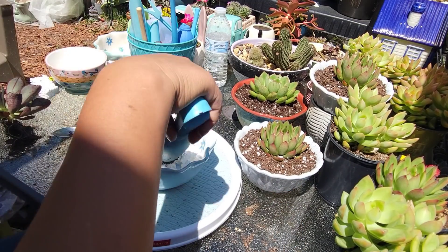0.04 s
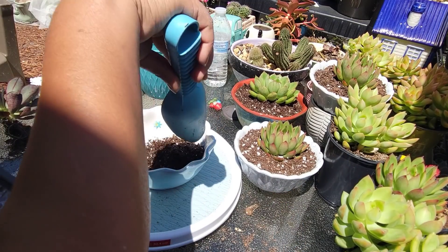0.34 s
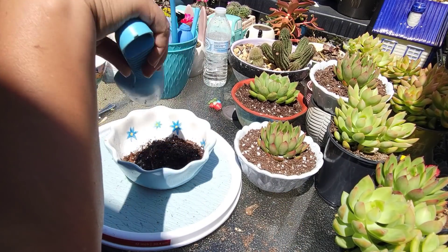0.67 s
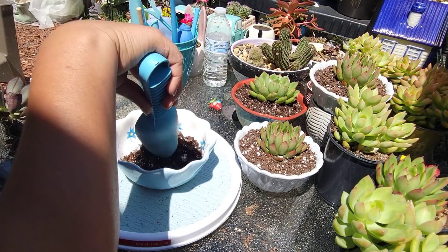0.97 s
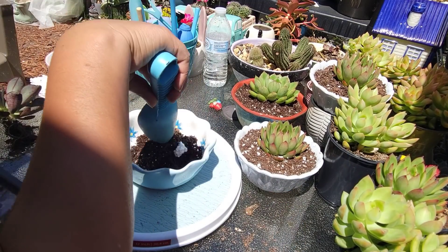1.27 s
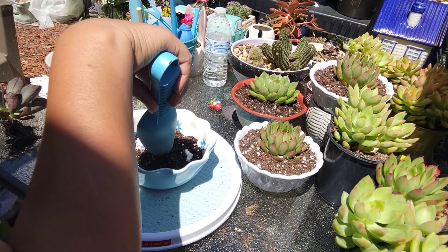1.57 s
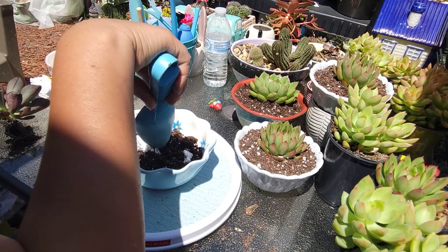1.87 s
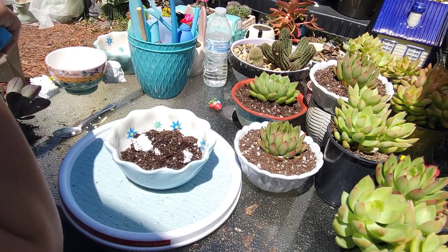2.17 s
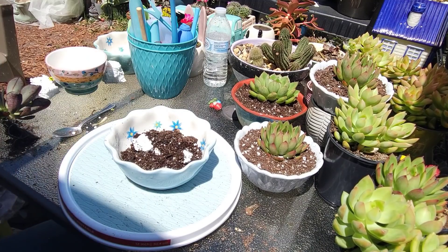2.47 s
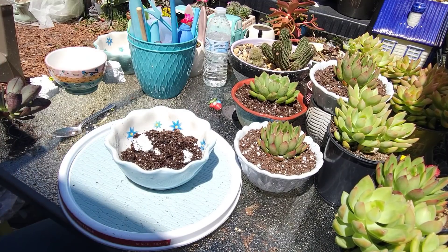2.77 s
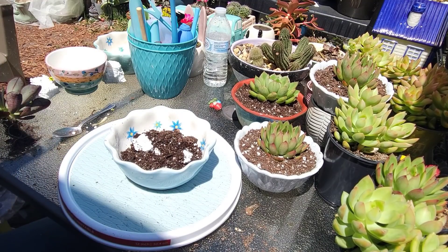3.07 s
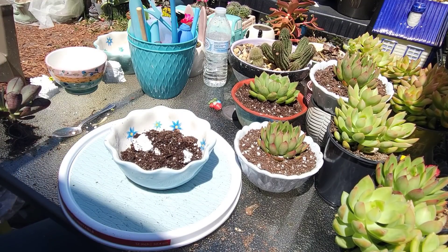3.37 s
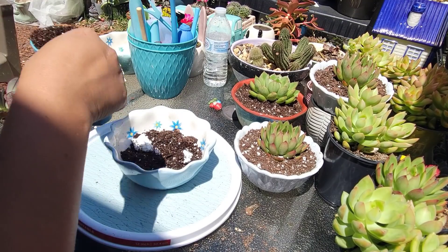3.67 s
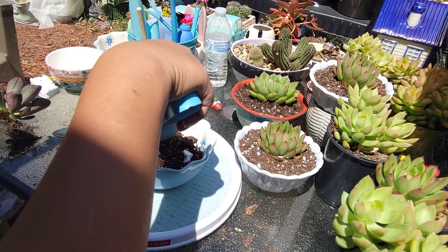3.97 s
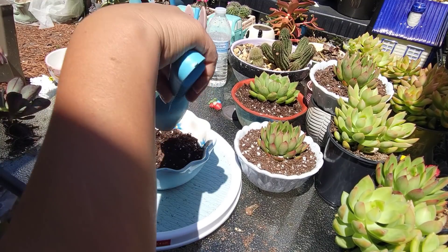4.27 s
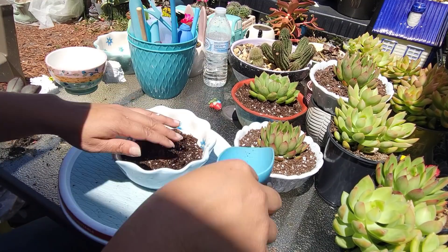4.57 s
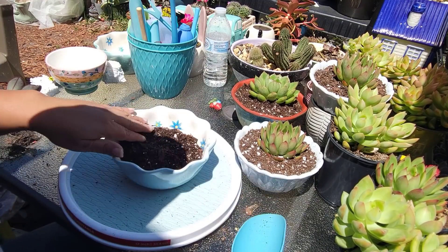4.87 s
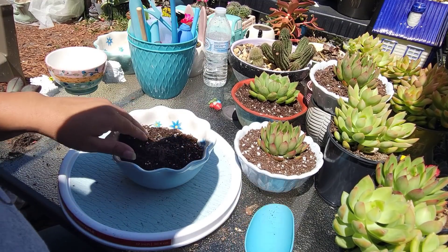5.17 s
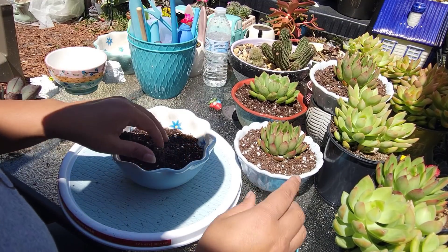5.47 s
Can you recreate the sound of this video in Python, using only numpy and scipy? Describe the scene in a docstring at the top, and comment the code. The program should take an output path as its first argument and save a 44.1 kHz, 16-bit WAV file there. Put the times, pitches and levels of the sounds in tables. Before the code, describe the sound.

Gritty soil slides from a plastic scoop into a clinking ceramic bowl, then a hard knock, over birds and distant traffic.

```python
"""Potting at a garden table, while distant traffic rumbles throughout. First gritty soil slides off a
plastic scoop, hissing and pattering into a ceramic bowl, and the scoop clinks on the rim. As stones and
clods fall, sparrows begin to chirp (three times near, once far off) and another bird scolds in dry rasps.
After three seconds the scoop digs for more, then grazes the bowl and spills a little soil.
Near the end something is set down on the table with a hard knock."""
import sys
import numpy as np
from scipy import signal
from scipy.fft import rfft, irfft, next_fast_len
from scipy.io import wavfile
from scipy.ndimage import map_coordinates

SR = 44100
rng = np.random.default_rng(int(sys.argv[2]) if len(sys.argv) > 2 else 0)


def transcribe(signal):
    """Save signal, clipped to [-1, 1], as a 16-bit WAV file at the path in sys.argv[1]."""
    frames = np.atleast_2d(signal).T
    limited = np.clip(frames, -1, 1)
    pcm = np.round(limited * 32767).astype(np.int16)
    wavfile.write(sys.argv[1], SR, pcm)


N = 252848

# The garden's echo. Each row: frequency in Hz, seconds to fade by 60 dB.
GARDEN_ECHO = [(200, .25), (1000, 0.41), (3000, 0.35), (6000, 0.41), (9000, 0.11), (15000, 0.022)]
# A sparrow's two kinds of call. Each row is a note: start within the call and length in seconds,
# first, middle and last pitch in Hz, relative level in dB, roughness from 0 to 1.
CHIRRUP = [(.001, .019, 3350, 3030, 3280, -2, 0.07), (0.012, 0.0314, 4216, 4116, 3430, -13, 0.72),
           (0.036, .027, 3696, 3280, 2480, -2, 0.27), (0.069, 0.038, 3620, 3890, 3690, -8.5, .62),
           (0.09, 0.0166, 2910, 2114, 1990, -12.5, 0), (.109, 0.0339, 2650, 2920, 3000, -2.5, 0.2),
           (.14, 0.0122, 2330, 1906, 1730, -11.5, .03), (0.154, 0.0247, 2770, 2710, 2630, -5.5, 0.07)]
CHEEP = [(0, 0.029, 3220, 3100, 3040, -0.5, 0.18), (0.019, .054, 2900, 3990, 3380, -0.5, 0.78),
         (.054, .051, 2770, 2844, 2970, -1, 0.51), (.107, 0.0278, 2830, 2516, 2430, -6, 0.67)]


def amp(db):
    """Turns decibels into a gain to multiply by."""
    return 10 ** (np.asarray(db) / 20)


def unit(x):
    """Scales a signal to an average strength (rms) of 1."""
    return x / np.sqrt(np.mean(x ** 2) + 1e-20)


def along(points, hz):
    """Reads between (Hz, value) points on a logarithmic frequency scale."""
    freqs, values = np.transpose(points)
    return np.interp(np.log(hz + 1), np.log(freqs + 1), values)


def wobble(rate, size=N):
    """A smooth curve through `rate` random points a second."""
    points = rng.standard_normal(int(size * rate / SR) + 4)
    return map_coordinates(points, [np.arange(size) * rate / SR])


def filtered(x, response):
    """Multiplies each frequency in x by response(hz)."""
    n = x.shape[-1]
    padded = next_fast_len(n + SR // 10)
    return irfft(rfft(x, padded) * response(np.fft.rfftfreq(padded, 1 / SR)), padded)[..., :n]


def coloured(x, spectrum):
    """Shapes the tone of x with (Hz, dB) points, then sets its strength to 1."""
    return unit(filtered(x, lambda hz: amp(along(spectrum, hz))))


def impulse(spectrum, size=2048):
    """A click of peak 1 with the given spectrum."""
    cepstrum = irfft(np.log(amp(along(spectrum, np.fft.rfftfreq(size, 1 / SR)))))
    # folding the second half onto the first packs the energy at the start
    cepstrum[1:size // 2] *= 2
    cepstrum[size // 2 + 1:] = 0
    click = irfft(np.exp(rfft(cepstrum)))
    return click / np.abs(click).max()


def fade(t, t60):
    """A gain that falls by 60 dB every t60 seconds."""
    return np.exp(-np.log(1000) * t / t60)


def add(out, s, x):
    """Mixes x into out, starting at s seconds."""
    i = round(s * SR)
    out[..., i:i + x.shape[-1]] += x[..., :N - i]


def scattered(start, end, count):
    """Loosely spaced random moments between start and end, in seconds."""
    return start + (end - start) * (np.arange(count) + rng.random(count)) / count


def from_left(x, lag_ms):
    """A sound from the left reaches the right ear later."""
    return filtered(x, lambda hz: np.exp(1j * np.pi * hz * np.array([[1], [-1]]) * lag_ms / 1000))


def diffuse(pair):
    """Scattered sound: long waves are alike at both ears, short ones unrelated."""
    mid, side = (pair[0] + pair[1]) / 2, (pair[0] - pair[1]) / 2
    side = filtered(side, lambda hz: hz / np.hypot(hz, 300))
    return np.array([mid + side, mid - side])


def spread(three, direct, lag_ms=0.408):
    """Stereo from three signals: one comes straight with the share `direct` of the power, two scatter."""
    return np.sqrt(direct) * from_left(three[0], lag_ms) + np.sqrt(1 - direct) * diffuse(three[1:])


def stereo_noise(size, direct, lag_ms=0.408):
    """White noise, partly direct and partly scattered."""
    return spread(rng.standard_normal((3, size)), direct, lag_ms)


def echo(x, t60s):
    """Scattered reflections, each frequency dying at its own speed."""
    hz, t, noise = signal.stft(rng.standard_normal((2, SR // 2)), SR, nperseg=256)
    tail = signal.istft(noise * fade(t, along(t60s, hz)[:, None]), SR, nperseg=256)[1]
    return signal.fftconvolve(x, tail / np.linalg.norm(tail[0]), axes=1)[:, :N]


def traffic():
    """Distant engines make a low rumble that swells twice, along with faint open-air hiss."""
    # The tone of the engines and of the air. Each row: frequency in Hz, relative level in dB.
    engine_tone = [(12, -47), (20, -8.5), (48, 4), (68, 6.5), (93, 0.5), (145, -15), (209, -23.5),
                   (242, -14.5), (300, -46), (390, -60), (660, -120)]
    air_tone = [(130, -27), (220, -5.5), (383, -14), (419, -17), (450, -10.5), (483, -13), (953, -17),
                (1080, -18.5), (1160, -17.5), (2060, -25.5), (2640, -22), (3270, -29.5), (15800, -45)]
    # The swells. Each row: time of the top in seconds, half width in seconds, rise in dB.
    surges = [(2.8, 0.83, 1.5), (5.56, .13, 4.5)]
    mid, side = coloured(rng.standard_normal((2, N)), engine_tone)
    rumble = mid + amp(-14) * np.array([side, -side])
    air = coloured(stereo_noise(N, direct=0.23, lag_ms=0.45), air_tone)
    surge_db = sum(db * np.exp(-((np.arange(N) / SR - s) / width) ** 2) for s, width, db in surges)
    return amp(-45.5 + surge_db) * rumble + amp(-59) * air


def scolding_bird():
    """Harsh calls with no pitch: a fluttering hiss swells through a resonance of the throat."""
    # The calls. Each row: middle in seconds, length in seconds, relative level in dB, resonance in Hz.
    rasps = [(1.52, 0.048, -45.5, 6200), (2.713, 0.11, -42.5, 5500), (2.945, .11, -37, 4200),
             (3.057, 0.055, -52.5, 2900), (3.232, .14, -33.5, 6650), (3.574, 0.091, -32, 5200),
             (4.703, 0.11, -46, 5030), (5.055, .075, -38.5, 4870), (5.243, 0.14, -37, 5670),
             (5.395, 0.11, -40, 6760), (5.715, 0.082, -42, 5500)]
    # The tone they share. Each row: frequency in Hz, relative level in dB.
    rasp_tone = [(1100, -38), (1800, -12.5), (2300, -13.5), (3100, -3.5), (3900, -7), (5000, -6),
                 (6600, -4.5), (7500, -14), (8600, -9), (11500, -24.5), (14500, -18), (15700, -37)]
    out = np.zeros((2, N))
    ripple_hz = np.arange(0, SR / 2, 170)
    for s, length, db, throat_hz in rasps:
        t = np.arange(int(2 * length * SR)) / SR - length
        hiss = coloured(stereo_noise(len(t), direct=0.17), rasp_tone)
        ripple_db = 3.5 * rng.standard_normal(len(ripple_hz))  # each call has its own peaks and dips
        throat = lambda hz: 1 + 1.15 / (1 + ((hz - throat_hz) / 550) ** 2)
        hiss = unit(filtered(hiss, lambda hz: amp(np.interp(hz, ripple_hz, ripple_db)) * throat(hz)))
        steepness = np.where(t < 0, 3.6, 2.1)  # a call starts more abruptly than it ends
        swell = np.exp(-np.abs(t / (0.4 * length)) ** steepness)
        flutter = amp(0.62 * wobble(298, size=len(t)))
        add(out, s - length, amp(db + 1.5) * swell * flutter * hiss)
    return out + amp(-16.5) * echo(out, GARDEN_ECHO)


def sparrow_notes():
    """Gives every note of every chirp its start, length, three pitches, level and roughness."""
    # The chirps. Each row: start in seconds, kind of call, relative level in dB, pitch ratio,
    # length ratio, loss of high notes with distance in dB per octave.
    chirps = [(1.187, CHIRRUP, -34.5, 1.036, .975, -1.5), (2.569, CHIRRUP, -32.5, 0.99, 1.0, -6),
              (4.139, CHIRRUP, -60, .93, 1.12, 10), (4.588, CHEEP, -40.5, .99, 1.01, 1.5)]
    mid_range_hz = 3000
    for onset, call, call_db, pitch, stretch, dull_db in chirps:
        for s, length, first, middle, last, db, rough in call:
            level = call_db + db - dull_db * np.log2(middle / mid_range_hz)
            pitches = pitch * np.array([first, middle, last])
            yield onset + stretch * s, stretch * length, pitches, level, rough


def sparrows():
    """Each note is a gliding whistle with a weak octave; a fast flutter roughens it."""
    song = np.zeros(N)
    for s, length, pitches, db, rough in sparrow_notes():
        n = int(length * SR)
        progress = np.linspace(0, 1, n)
        glide_hz = np.polyval(np.polyfit([0, .5, 1], pitches, 2), progress)
        phase = 2 * np.pi * np.cumsum(glide_hz) / SR
        flutter = wobble(997, size=n) + 1j * wobble(989, size=n)
        voice = np.sqrt(1 - rough) + np.sqrt(rough / 2) * flutter
        whistle = np.real(voice * (np.exp(1j * phase) + amp(-30) * np.exp(2j * phase)))
        swell = np.abs(np.sin(np.pi * progress)) ** 0.42
        add(song, s, amp(db + 4) * swell * whistle)
    bright = filtered(song, lambda hz: amp(along([(6300, 0.89), (7500, 13.8)], hz)))
    direct = from_left(bright, lag_ms=0.461)
    pots = echo(direct, [(2000, 0.11), (6000, 0.086)])  # quick scatter off the things on the table
    return direct + amp(-3) * pots + amp(-10) * echo(direct, GARDEN_ECHO)


def table_knocks():
    """Each blow makes a crack; the table top rings and the things on it rattle."""
    # The blows. Each row: start in seconds, relative level in dB, extra level of the crack in dB.
    blows = [(1.6091, -36.5, 4.5), (5.131, -34.5, 6), (5.2776, -31.5, 1), (5.3042, -8.5, 4)]
    # The table's ringing tones. Each row: pitch in Hz, relative level in dB, seconds to fade by 60 dB.
    table_modes = [(310, -5.5, 0.069), (448, -7.5, 0.14), (527, -9, 0.16), (577, 1.5, 0.08),
                   (702, -7, 0.12), (845, -5.5, 0.15), (943, -5.5, 0.033), (1063, -0.5, 0.11),
                   (1206, 2, 0.056), (1330, 3.5, 0.046), (1480, -2, 0.1), (1854, -2, 0.12),
                   (2136, 3.5, 0.059), (2450, -16, .06), (2840, -8, .08)]
    # The tone of the rattle and of the crack. Each row: frequency in Hz, relative level in dB.
    rattle_tone = [(59, -43), (100, -28), (580, -9), (1240, -12), (1670, -22), (1820, -17), (5030, -29),
                   (6920, -43), (7370, -35), (8730, -36), (11000, -43), (14200, -36), (15800, -64)]
    crack_tone = [(200, -42), (700, -28), (1300, -6), (1900, 2), (2400, 7), (2900, -6), (4000, -6),
                  (6000, -51), (15000, -37)]
    out, t = np.zeros((2, N)), np.arange(SR // 2) / SR
    ring = np.zeros((2, len(t)))
    for k, (hz, db, t60) in enumerate(table_modes):
        # neighbouring tones swing opposite ways; the shorter the wave, the more out of step the ears
        phase = np.pi * (k + np.array([[0], [hz / 2800]]))
        lean_left = amp(np.array([[1], [-1]]) * along([(500, 1.3), (1500, 0.38)], hz))
        ring += lean_left * amp(db) * fade(t, t60) * np.sin(2 * np.pi * hz * t + phase)
    attack = 1 - np.exp(-t / 0.00097)
    for s, db, crack_db in blows:
        rattle = coloured(stereo_noise(len(t), direct=.35, lag_ms=.03), rattle_tone) * fade(t, t60=.11)
        body = amp(-10.5) * ring + amp(-6.5) * rattle * amp([[2], [-2]])
        add(out, s, amp(db) * body * attack)
        add(out, s, amp(db + crack_db) * impulse(crack_tone))
    return out


def bowl_clinks():
    """The scoop clacks on the rim and the ceramic bowl rings on."""
    # The touches. Each row: start in seconds, then in dB the ring, the clack and the lowest tone's loss.
    touches = [(.9284, -28, -18, -4.5), (3.978, -68, -80, 18), (4.012, -58, -78, 8)]
    # The bowl's ringing tones. Each row: pitch in Hz, relative level in dB, seconds to fade by 60 dB.
    bowl_modes = [(916, -6, .54), (2055, -2.5, .46), (3537, 0.5, .26), (4097, -20, .2), (4764, -16, .14),
                  (5350, -1, .11), (6050, -7, .1), (7472, -8, .14), (8942, -4, .11)]
    # The scoop's own short ring. Each row: frequency in Hz, relative level in dB.
    clack_tone = [(150, -52), (280, -43), (430, 4), (650, -13.5), (1000, -5), (1400, -1), (1650, -11),
                  (2000, 4.5), (2350, -9), (2780, 0), (3200, -14), (5300, -14), (9000, -15.5), (15500, -25)]
    snap_tone = [(800, -21), (4000, -21), (15000, -7)]
    out, t = np.zeros((2, N)), np.arange(SR * 3 // 4) / SR
    ear_phase = np.array([[0], [2.3]])  # the ring reaches the two ears out of step
    lowest_hz = bowl_modes[0][0]
    for s, ring_db, clack_db, loss_db in touches:
        ring = np.zeros((2, len(t)))
        for hz, db, t60 in bowl_modes:
            tone = np.sin(2 * np.pi * hz * t + ear_phase)
            # the bowl is not quite round, so each tone has a close twin that beats with it
            twin = amp(-14) * np.sin(2 * np.pi * (hz + 11) * t)
            gain = amp(db - loss_db * (lowest_hz / hz) ** 2)  # a light graze stirs mostly high tones
            ring += gain * fade(t, t60) * (tone + twin)
        clack = coloured(stereo_noise(len(t), direct=0.043, lag_ms=0.1), clack_tone)
        snap = coloured(stereo_noise(len(t), direct=0.67, lag_ms=0.027), snap_tone)
        contact = clack * fade(t, t60=0.059) + amp(9) * snap * fade(t, t60=0.0036)
        add(out, s, amp(ring_db) * ring + amp(clack_db) * contact)
    return out


def clods():
    """Lumps of soil land with a dull, short resonance; the heavy ones tumble on."""
    # Heavy clods and soft bumps. Each row: start in seconds, relative level in dB, pitch in Hz.
    heavy = [(1.684, -41.5, 564), (1.80, -40, 336), (2.056, -42.5, 620), (2.42, -39.5, 283),
             (3.196, -25, 397), (5.135, -30, 686), (5.281, -22.5, 630), (5.378, -38, 330),
             (5.517, -38, 470)]
    tumble_s, loss_db, pitch_ratio = .034, 8.5, 0.87  # from one contact to the next
    landings = [(s + k * tumble_s, db - k * loss_db, hz * pitch_ratio ** k)
                for s, db, hz in heavy for k in range(3)]
    # small lumps roll off the heap
    landings += [(s, -45, 533 * 2 ** rng.uniform(-0.19, 0.33)) for s in scattered(1.92, 2.22, count=5)]
    out, t = np.zeros((2, N)), np.arange(SR // 5) / SR
    envelope = fade(t, t60=0.17) * (1 - np.exp(-t / 0.0013))
    for s, db, pitch in landings:
        noise = stereo_noise(len(t), direct=0.64, lag_ms=.05)
        thud = filtered(noise, lambda hz: 1 / (1 + ((hz - pitch) / (.3 * pitch)) ** 2))
        add(out, s, amp(db - 9) * unit(thud) * envelope)
    return out


def ticks():
    """Short bright ticks: grit on the scoop, then clicks as something is set on the table."""
    # Single ticks, loud and faint. Each row: start in seconds, relative level in dB.
    timed = [(.234, -46), (.6145, -65), (.9848, -27), (1.3786, -35.5), (1.5507, -33.5), (1.6087, -36),
             (1.6433, -32.5), (1.7055, -40), (2.116, -39), (2.826, -38.5), (4.2307, -46), (5.1703, -35.5),
             (5.2784, -29)]
    stray = [(s, -39) for s in scattered(1.85, 1.95, count=2)]  # two more fall as the scoop empties
    tick_tone = [(500, -23), (2500, 3.5), (6500, 0), (15000, -6.5)]
    out, t = np.zeros((2, N)), np.arange(SR // 20) / SR
    for s, db in list(timed) + stray:
        tick = coloured(rng.standard_normal((2, len(t))), tick_tone)
        add(out, s, amp(db - 7) * tick * fade(t, t60=0.045))
    return out


def grains(rate, size_db, bed):
    """Three streams of tiny collisions, `rate` a second and uneven in size, over a smooth rush."""
    hits = (rng.random((3, N)) < rate / SR) * rng.standard_normal((3, N))
    sizes = amp(size_db * rng.standard_normal((3, N)))
    return unit(hits * sizes) + bed * rng.standard_normal((3, N))


def stroke(s, length, rise, release, swell_db=0):
    """The gain of one movement: it rises, holds while swelling or sagging, and dies away."""
    t = np.arange(N) / SR - s
    hold = amp(swell_db * (np.clip(t / length, 0, 1) - 1))
    return fade(np.maximum(-t, 0), rise) * hold * fade(np.maximum(t - length, 0), release)


def soil_flow():
    """The gains of fine grit and coarse crumbs as soil slides off the scoop."""
    # The pours. Each row: start of full flow, length, 60 dB rise time and 60 dB fall time in seconds,
    # then in dB the relative grit level, the relative crumb level and the swell of the grit.
    pours = [(0.23, 0.067, 0.24, 0.39, -49.5, -66, 2), (0.678, .09, 0.052, 0.18, -64, -67.5, -2),
             (0.984, .012, 0.049, 0.47, -51, -54, 4), (1.183, .17, 0.13, 0.56, -56.5, -69, 9),
             (1.541, 0.11, 0.75, 0.2, -50.5, -58, 6.5), (1.795, 0.14, .13, 0.12, -52.5, -55.5, 5.5),
             (2.116, 0.11, 0.041, 0.22, -58.5, -57.5, -7), (4.181, 0.052, 0.24, 0.23, -62, -68.5, 1)]
    trickle = stroke(0, length=1.9, rise=.1, release=.3)  # loose soil runs between the first pours
    grit, crumbs = amp(-69.5) * trickle, amp(-70.5) * trickle
    for s, length, rise, release, grit_db, crumbs_db, swell_db in pours:
        grit = np.hypot(grit, amp(grit_db) * stroke(s, length, rise, release, swell_db))
        crumbs = np.hypot(crumbs, amp(crumbs_db) * stroke(s, length, rise, release))
    return grit, crumbs


def soil():
    """Fine grit hisses and crumbs patter off the scoop; digging crunches through its hollow blade."""
    # The tone of the grit, the crumbs and the blade. Each row: frequency in Hz, relative level in dB.
    grit_tone = [(700, -14), (1500, -5.5), (4000, -7.5), (6000, -4), (9000, -4), (11200, -9.5), (13500, -7),
                 (15500, -8)]
    crumb_tone = [(120, 8.5), (300, -6.5), (600, -5.5), (1300, 0), (2000, -9), (3000, -6.5), (4500, -11.5),
                  (9000, -52)]
    blade_tone = [(120, -3), (200, -7), (517, -7.5), (621, -15.5), (929, -11.5), (1490, -9), (2490, -16.5),
                  (2680, -10), (4160, -20), (5570, -21), (6110, -12), (7600, -20), (8330, -17),
                  (14200, -29), (15800, -26)]
    # Pushes into the soil. Each row: start in seconds, length in seconds, relative level in dB.
    digs = [(3.125, 0.016, -39.5), (3.204, .01, -41)]
    grit, crumbs = soil_flow()
    bites = [amp(db) * stroke(s, length, rise=0.024, release=0.46) for s, length, db in digs]
    fine = grains(rate=3500, size_db=4.5, bed=.8)
    coarse = grains(rate=700, size_db=4.5, bed=.6)
    hiss = coloured(spread(fine, direct=0.012), grit_tone) * amp(4.5 + 1.4 * wobble(60))
    patter = coloured(spread(coarse, direct=0.73), crumb_tone) * amp(8 + 3 * wobble(40.2))
    dug = grains(rate=1500, size_db=3, bed=.6)
    crunch = coloured(spread(dug, direct=.55), blade_tone) * amp(2.5)
    return grit * hiss + crumbs * patter + np.max(bites, axis=0) * crunch


def scene():
    """The potting and its faint garden echo, with the birds and the traffic."""
    potting = soil() + ticks() + clods() + bowl_clinks() + table_knocks()
    return potting + amp(-26) * echo(potting, GARDEN_ECHO) + sparrows() + scolding_bird() + traffic()


def record(dry):
    """Cuts away the very highest treble."""
    top_hz = 15700
    return filtered(dry, lambda hz: 1 / (1 + (hz / top_hz) ** 120))


dry = scene()
out = record(dry)
transcribe(out)
```